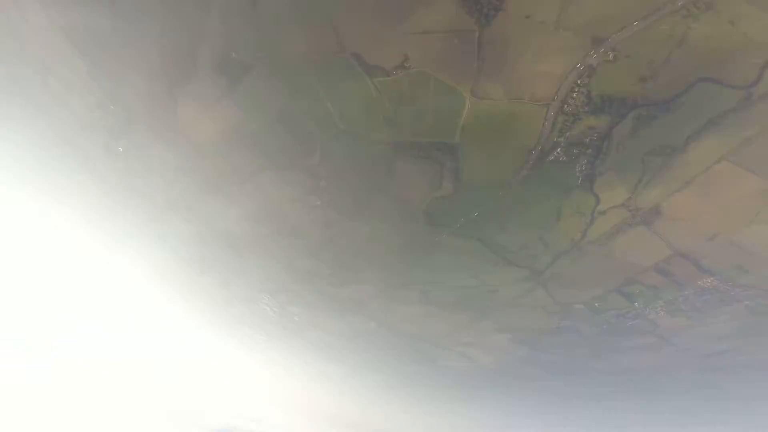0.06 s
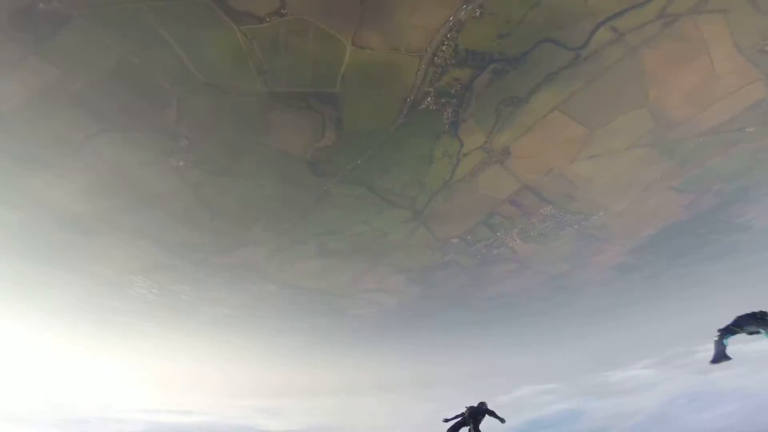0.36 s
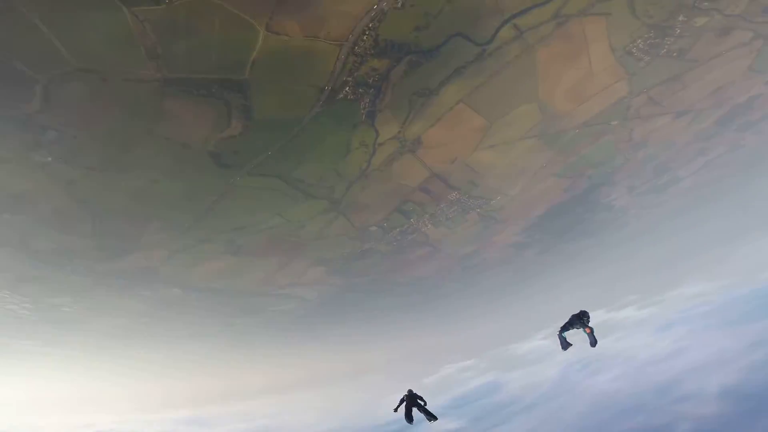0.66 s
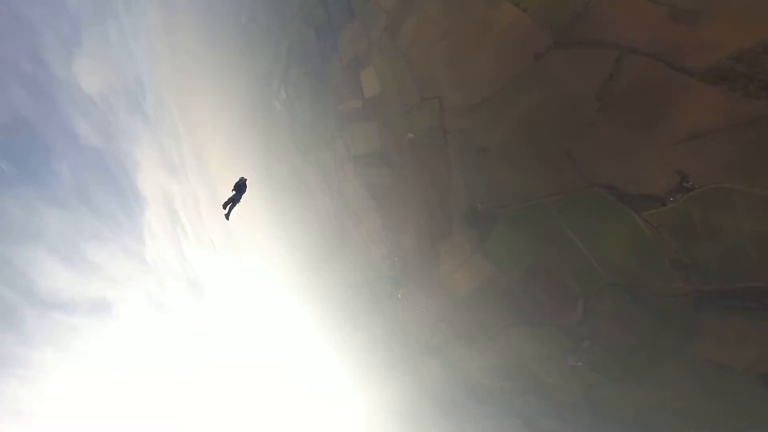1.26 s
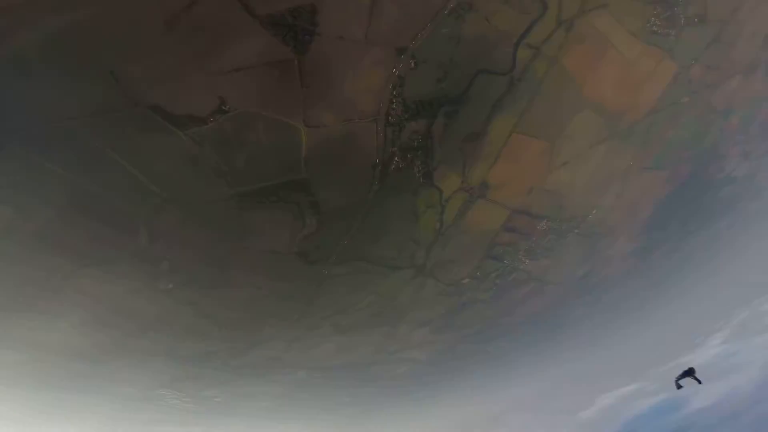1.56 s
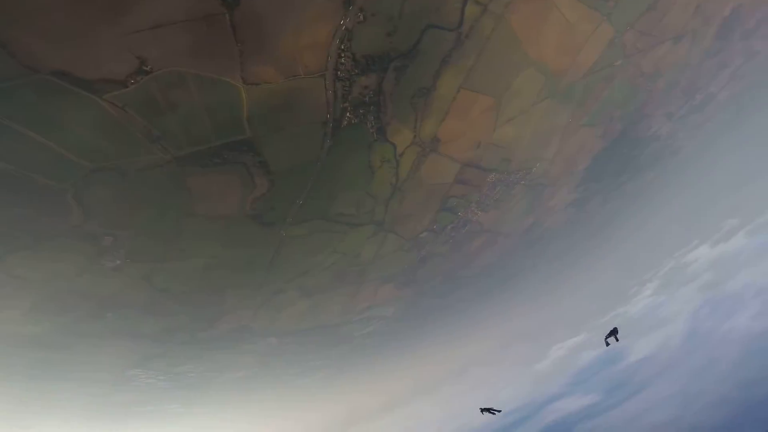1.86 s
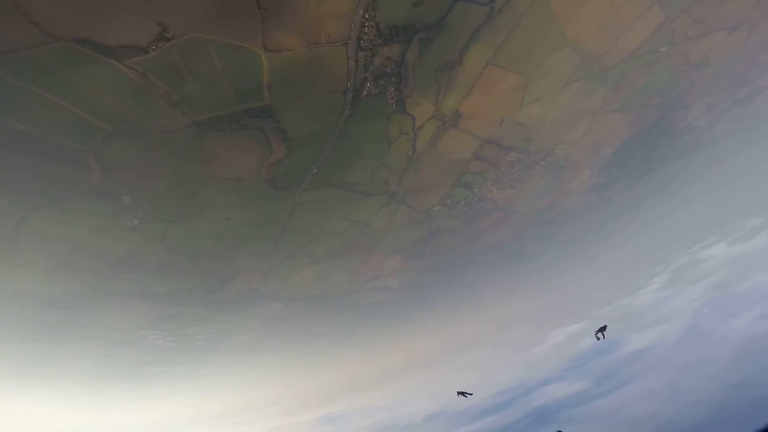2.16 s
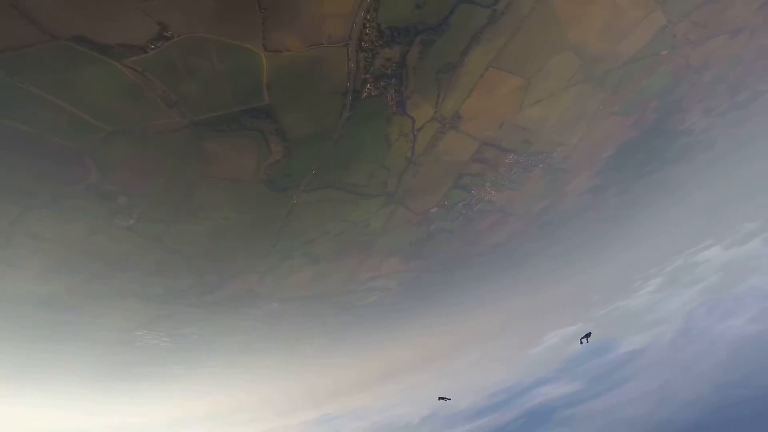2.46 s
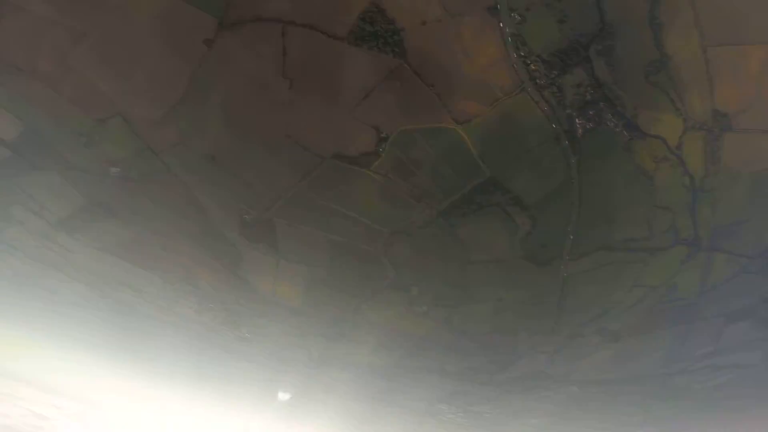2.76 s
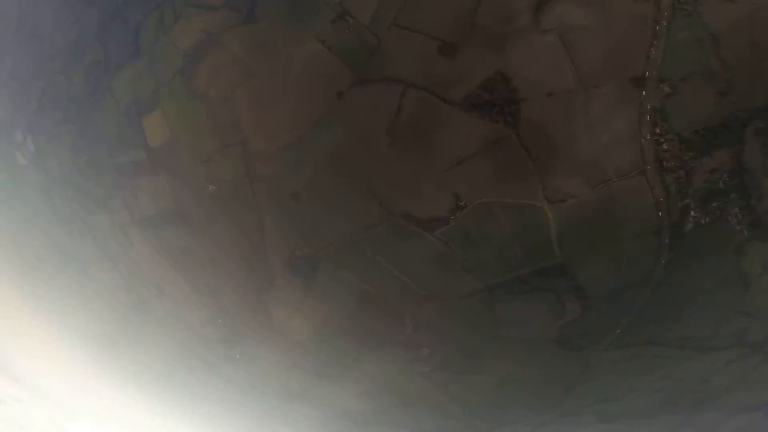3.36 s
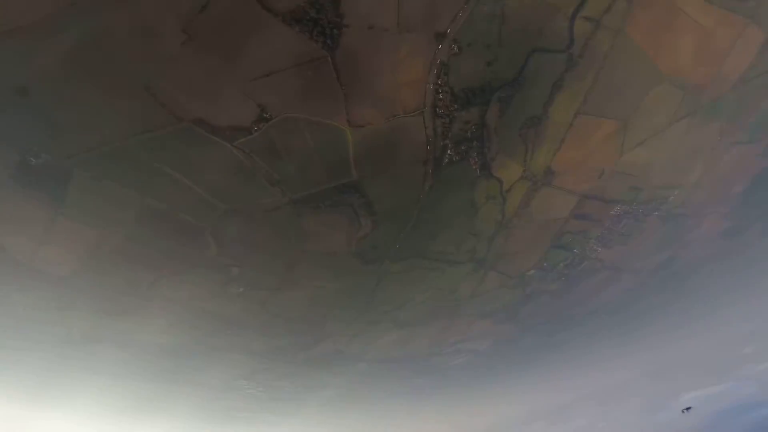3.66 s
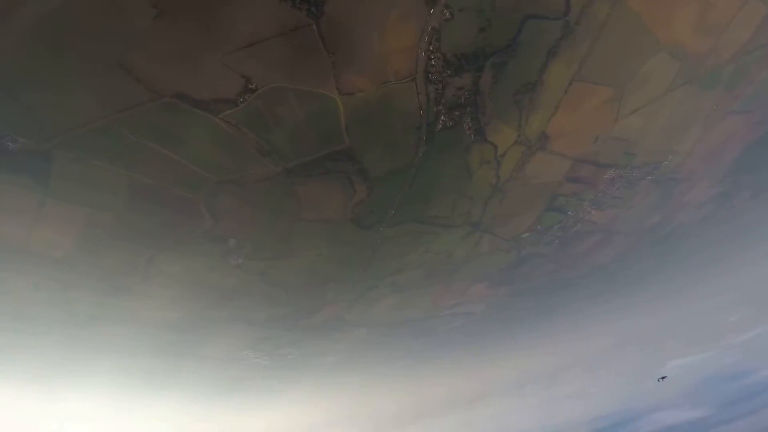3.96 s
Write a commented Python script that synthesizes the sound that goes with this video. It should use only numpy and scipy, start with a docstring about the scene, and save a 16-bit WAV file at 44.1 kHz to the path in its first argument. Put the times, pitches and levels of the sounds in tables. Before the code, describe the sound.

Rushing wind beats on a skydiver's microphone, briefly dropping out, hissing and faintly whistling.

```python
"""Wind roars on a small camera as a skydiver turns in freefall.
Eddies (swirls of air) beat on the microphone port, its small opening, and drop away when it turns
out of the wind. Head-on, the flow becomes a bright jet hiss. The port howls hollowly,
an edge whistles thinly, and three pressure surges briefly choke the microphone."""
import sys
import numpy as np
from scipy import signal
from scipy.io import wavfile
from scipy.ndimage import uniform_filter1d

SR = 44100
rng = np.random.default_rng(int(sys.argv[2]) if len(sys.argv) > 2 else 0)


def persist_wave(psi):
    """Save psi, clipped to +-1, as 16-bit WAV."""
    counts = np.round(np.clip(psi, -1, 1) * 32767).astype(np.int16)
    wavfile.write(sys.argv[1], SR, np.atleast_2d(counts).T)


N = 176400  # 4 seconds

# pressure surges that choke the microphone: time_s, level_db
PRESSURE_SURGES = [(0.968, -9.5), (1.512, -11.5), (2.874, -20)]
RECOVER_S = 0.0059  # sets how slowly the microphone recovers from one


def from_db(db):
    """Turn decibels into a gain to multiply by."""
    return 10 ** (np.asarray(db) / 20)


def rms_one(x):
    """Scale a signal so its average strength (rms) is 1."""
    return x / np.sqrt(np.mean(x ** 2) + 1e-20)


def in_time(rows):
    """Join a table's timed points with lines: one curve per value column."""
    times, *columns = np.transpose(rows)
    return [np.interp(np.arange(N) / SR, times, column) for column in columns]


def during(rows, fade_s=.01):
    """1 from a table's first time to its last, fading to 0 outside."""
    start, end = rows[0][0], rows[-1][0]
    return np.interp(np.arange(N) / SR, [start - fade_s, start, end, end + fade_s], [0, 1, 1, 0])


def drift(rate_hz):
    """A smooth random wobble of size about 1; a higher rate moves faster."""
    pole = np.exp(-40 * np.pi * rate_hz / SR)
    noise = rng.standard_normal(N // 20 + 2002)  # one value per 20 samples
    slow = signal.lfilter([1], [1, -2 * pole, pole * pole], noise)[2000:]
    return np.interp(np.arange(N) / 20, np.arange(len(slow)), rms_one(slow))


def turbulence(colour, flicker_db, rate_hz, lift=lambda hz: 0):
    """Churning air: noise bands flicker separately, shaped in dB by colour and lift(hz)."""
    edges = np.geomspace(20, 17000, 29)
    colour_hz, colour_db = np.transpose(colour)
    white, out = rng.standard_normal((2, N)), 0
    for k, (low, high) in enumerate(zip(edges, edges[1:])):
        hz = np.sqrt(low * high)
        band = signal.sosfilt(signal.butter(2, [low, high], "band", fs=SR, output="sos"), white[k % 2])
        band_db = np.interp(np.log(hz), np.log(colour_hz), colour_db)
        out = out + band * from_db(band_db + flicker_db * drift(rate_hz) + lift(hz))
    return rms_one(out)


def air_tone(rows, width_hz, waver_hz):
    """A narrow band of noise around a gliding, wavering pitch."""
    hz, db = in_time(rows)
    phase = 2 * np.pi * np.cumsum(hz + waver_hz * drift(39.3)) / SR
    swirl = drift(width_hz) + 1j * drift(width_hz)
    steadier = swirl / np.sqrt(np.abs(swirl))  # evens out the loudness
    return during(rows) * from_db(db) * rms_one(np.real(steadier * np.exp(1j * phase)))


def sputter(depth_db=6, rate_hz=110):
    """Gain of an air tone that keeps catching and breaking off."""
    return rms_one(from_db(depth_db * np.tanh(2 * drift(rate_hz))))


def edge_whistle():
    """Air whistles over an edge, at times breaking into fizz or locking into a clean tone."""
    # thin whistles, one table each: time_s, pitch_hz, level_db
    glides = [
        [(.58, 8400, -53), (.73, 11300, -44), (.85, 12700, -48)],
        [(1.607, 10600, -40), (1.635, 11700, -47), (1.683, 13600, -33)],
        [(1.712, 12900, -39), (1.733, 14400, -35), (1.762, 14900, -37)],
        [(2.04, 13300, -50), (2.085, 12800, -40), (2.11, 13900, -36), (2.2, 12600, -52), (2.45, 12000, -53)],
        [(2.96, 12000, -50), (3.09, 13700, -46)],
        [(3.62, 8830, -43), (4, 10100, -57)],
    ]
    # the sputtering fizz: time_s, pitch_hz, level_db
    fizz_glide = [(1.79, 14900, -43), (1.91, 14400, -34), (2.02, 14200, -46)]
    # the clean tone: time_s, pitch_hz, level_db
    tone_glide = [(2.09, 13300, -41), (2.112, 14200, -30), (2.16, 13300, -40), (2.24, 12800, -52)]
    thin_gain = from_db(4.5) * np.sqrt(sputter())
    thin = thin_gain * sum(air_tone(rows, width_hz=490, waver_hz=176) for rows in glides)
    fizz = sputter() * air_tone(fizz_glide, width_hz=1400, waver_hz=330)
    tone = from_db(4) * air_tone(tone_glide, width_hz=36, waver_hz=25.2)
    return thin + fizz + tone


def port_howl():
    """Air passing the port makes it howl hollowly."""
    # howls, one table each: time_s, pitch_hz, level_db
    glides = [
        [(.74, 615, -27), (.815, 725, -17), (.86, 760, -24)],
        [(1.61, 400.2, -25), (1.66, 457, -16), (1.728, 522, -28)],
        [(2.05, 1100, -20), (2.14, 914, -32), (2.25, 774, -21.5), (2.36, 702, -27)],
        [(2.99, 757, -21), (3.06, 880, -16.5), (3.125, 915, -17.5)],
    ]
    return sum(air_tone(rows, width_hz=173, waver_hz=20.7) for rows in glides)


def surges(build_s=0.014, lead_s=0.013):
    """Pressure builds, the microphone chokes, and its output swings below zero and creeps back."""
    t, out = np.arange(N) / SR, 0
    for time_s, db in PRESSURE_SURGES:
        build = 0.43 * np.exp(-.5 * ((t - time_s + lead_s) / build_s) ** 2)
        age = np.maximum(t - time_s, 0) / RECOVER_S
        undershoot = age * np.exp(1 - age)
        out = out + from_db(db) * (build * np.exp(-age) - undershoot)
    return out


def choke(length_s=0.035, depth_db=-10.5):
    """Gain of the microphone: each surge turns the wind noise down for a moment."""
    t = np.arange(N) / SR
    shut = sum((t > time_s + RECOVER_S / 2) & (t < time_s + length_s) for time_s, _ in PRESSURE_SURGES)
    return from_db(depth_db * uniform_filter1d(shut * 1.0, size=128))


def lulls(close_s=0.035, open_s=0.018):
    """Gain of the wind: it drops as the port turns away, then catches again faster."""
    # sheltered moments: start_s, end_s, depth_db
    dips = [(0.884, 0.928, -16.5), (0.973, 1.015, -24), (1.074, 1.111, -7), (1.384, 1.471, -15),
            (1.517, 1.602, -14), (1.733, 1.789, -10.5), (2.752, 2.773, -6.5), (2.866, 2.927, -13.5),
            (3.321, 3.398, -8.5), (3.534, 3.598, -8)]
    t, dip_db = np.arange(N) / SR, 0
    for start, end, db in dips:
        dip_db += db * np.clip(np.minimum((t - start) / close_s, (end - t) / open_s) + .5, 0, 1)
    return from_db(dip_db)


def buffets():
    """Large, slow eddies swell and pass, each a short, low thud of air."""
    # thuds: middle_s, length_s, level_db
    thuds = [(0.72, 0.051, -20.5), (1.549, 0.012, -23), (1.665, .06, -16), (2.817, 0.039, -14.5),
             (2.958, 0.04, -31)]
    # their deep sound: pitch_hz, level_db
    colour = [(30, 2), (90, -9), (300, 9), (500, 0), (1000, -21), (3000, -61)]
    t = np.arange(N) / SR
    swell = sum(from_db(db) * np.exp(-(2 * (t - middle) / length) ** 4) for middle, length, db in thuds)
    return swell * turbulence(colour, flicker_db=2, rate_hz=25)


def jet(level_db, fade_s=0.026, spit_db=5.5, spit_s=0.011, sag_db_per_s=4):
    """Head-on air makes a hiss that spits, then sags; also returns how far it is on (0 to 1)."""
    # bursts of hiss: start_s, end_s, level_db, attack_s
    bursts = [(1.02, 1.46, -4.5, .003), (1.782, 1.926, -1, 0.028), (3.103, 3.34, 0.5, 0.042)]
    # their bright sound: pitch_hz, level_db
    colour = [(4000, 0.5), (7500, 4), (13000, 1), (15500, -5)]
    t = np.arange(N) / SR
    share, gain = 0, 0
    for start, end, db, attack_s in bursts:
        burst = np.clip(np.minimum((t - start) / attack_s, (end - t) / fade_s) + .5, 0, 1)
        age = np.maximum(t - start, 0)
        share += burst
        gain += burst * from_db(db + spit_db * np.exp(-age / spit_s) - sag_db_per_s * age)
    hiss = from_db(1.5 + level_db) * gain * turbulence(colour, flicker_db=1.1, rate_hz=6.2)
    return hiss, share


def rush(level_db, flutter):
    """Tiny swirls rush over the camera body, dipping as the roar flutters up."""
    # the airy sound of the rush: pitch_hz, level_db
    colour = [(300, -2.5), (1200, 1.5), (2500, 1.5), (4000, -0.5), (5800, -2.5), (7500, -9), (10000, -17.5),
              (15000, -26.5)]
    return from_db(3.5 + level_db - 0.5 * flutter) * turbulence(colour, flicker_db=1.42, rate_hz=42)


def roar(level_db, flutter, mean_eddy_hz=478, bass_hz=228, loss_db_per_octave=11):
    """Eddies beat on the port, with less bass as they get smaller."""
    # eddy size as a pitch, higher for smaller eddies: time_s, pitch_hz
    eddy_pitch = [(.2, 340), (.82, 570), (.94, 440), (1.79, 463), (1.9, 310), (2.06, 680), (2.22, 690),
                  (2.72, 570), (2.81, 235), (2.95, 474), (3.11, 900), (3.2, 450), (4, 540)]
    # the low sound of the roar: pitch_hz, level_db
    colour = [(25, -6), (80, 1), (250, 1), (550, -1), (1000, -7), (2000, -15), (4000, -29), (8000, -55)]
    octaves_up = np.log2(in_time(eddy_pitch)[0] / mean_eddy_hz)

    def bass_change_db(hz):
        """Eddy size mostly changes the low bands."""
        return -loss_db_per_octave * octaves_up / (1 + (hz / bass_hz) ** 2)
    eddies = turbulence(colour, flicker_db=1.0, rate_hz=52, lift=bass_change_db)
    return from_db(2 + level_db + 0.95 * flutter) * eddies


def scene():
    """All of the wind meets one port, so both channels are alike."""
    # airflow strength as the diver turns: time_s, roar_db, rush_db
    airflow = [(0, -28.5, -36.5), (.13, -18.5, -27), (.54, -17.5, -28), (.63, -16, -23.5),
               (.79, -12.5, -27), (.86, -20.5, -30), (.95, -18, -28.5), (1.02, -25, -23),
               (1.35, -28, -19.5), (1.49, -19, -28), (1.65, -17.5, -24), (1.72, -18, -30.5),
               (1.79, -23.5, -28), (1.95, -21.5, -36), (2.08, -14.5, -35.5), (2.13, -22, -41),
               (2.46, -11.5, -29), (2.55, -13.5, -33), (2.85, -20.5, -29), (2.95, -15.5, -24.5),
               (3.1, -16, -27.5), (3.16, -27.5, -27), (3.3, -26, -29), (3.355, -30, -37),
               (3.43, -16, -25.5), (4, -14.5, -26.5)]
    roar_db, rush_db = in_time(airflow)
    flutter = drift(rate_hz=47)
    hiss, jet_share = jet(rush_db)
    rush_gain = 1 - 0.32 * jet_share  # the hiss replaces part of the rush
    wind = roar(roar_db, flutter) + rush_gain * rush(rush_db, flutter) + hiss + buffets()
    air = wind * lulls() * choke() + edge_whistle() + port_howl() + surges()
    return np.array([air, air])


def record(dry, ceiling=.9, cutoff_hz=15500):
    """Round off the loudest peaks and cut the highest treble."""
    rounded = dry / (1 + (dry / ceiling) ** 4) ** .25
    return signal.sosfiltfilt(signal.ellip(10, .05, 60, cutoff_hz, fs=SR, output="sos"), rounded)


dry = scene()
out = record(dry)
persist_wave(out)
```